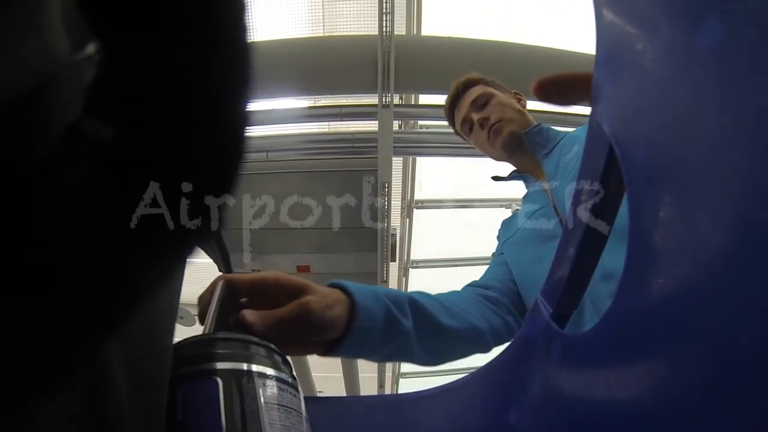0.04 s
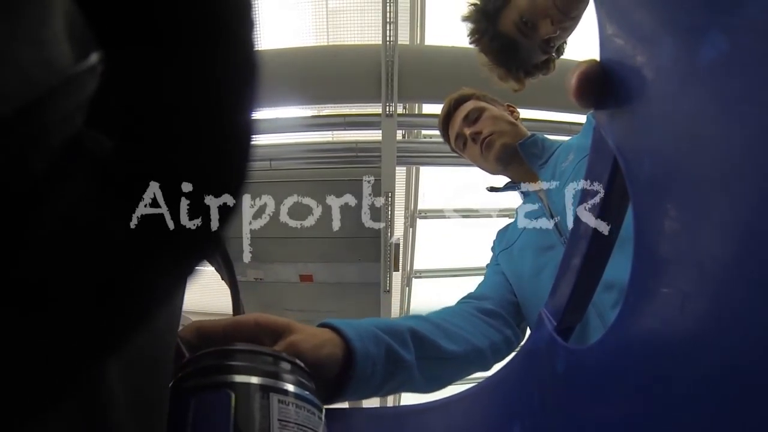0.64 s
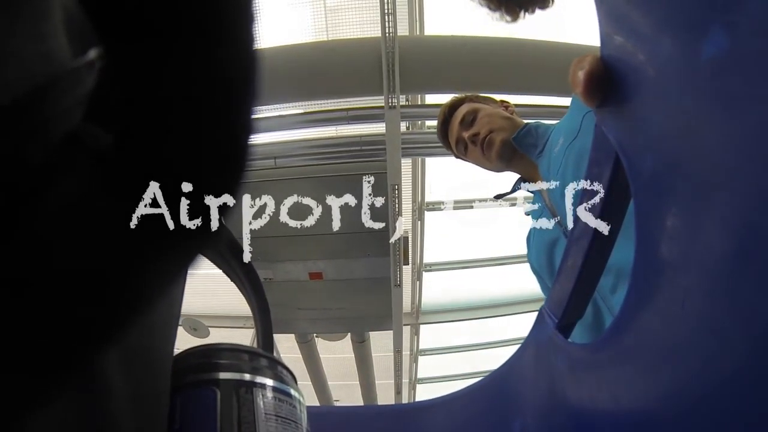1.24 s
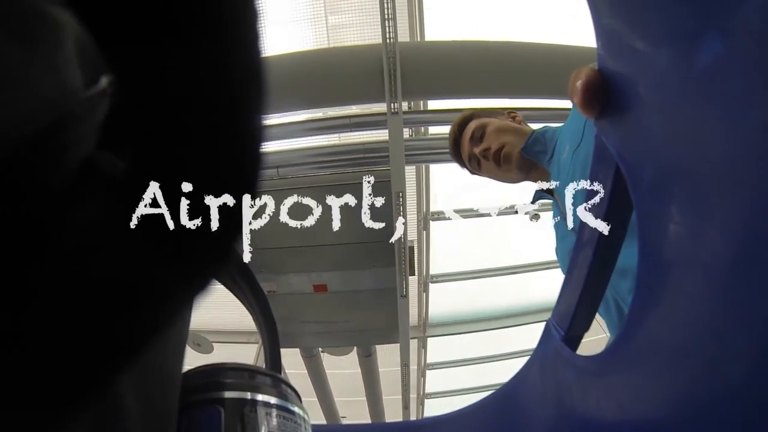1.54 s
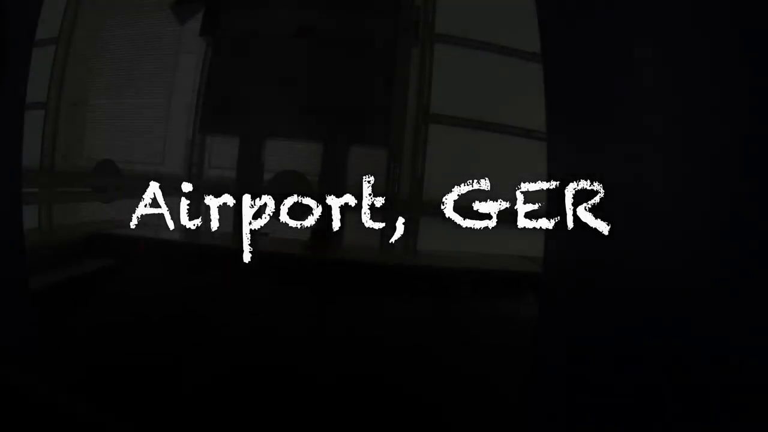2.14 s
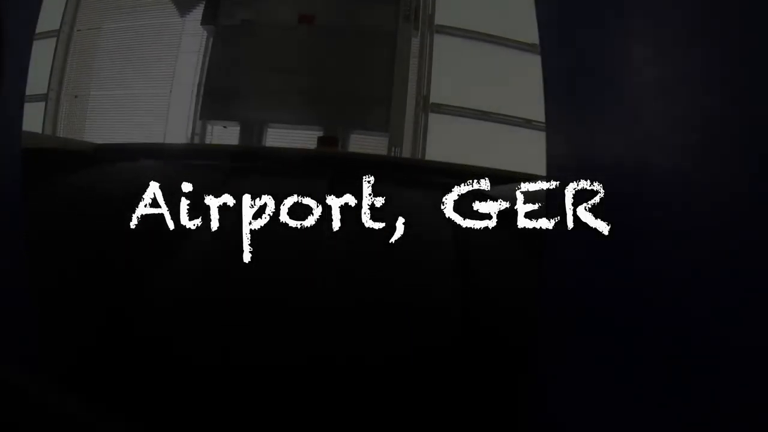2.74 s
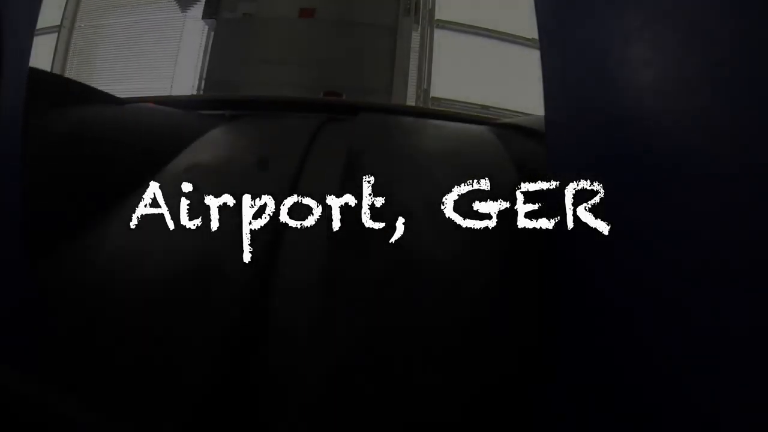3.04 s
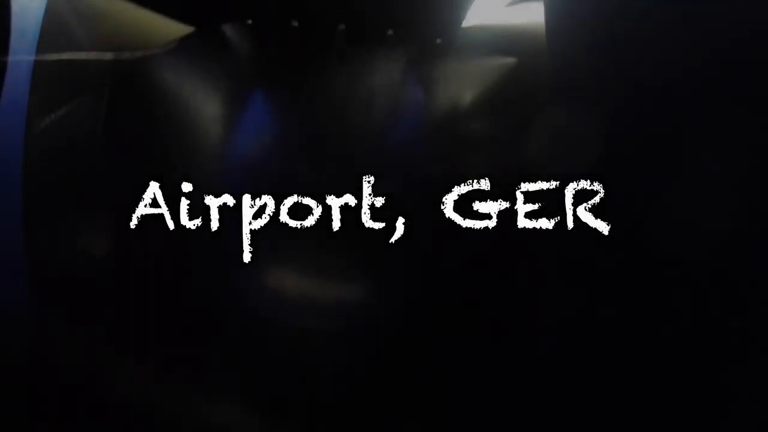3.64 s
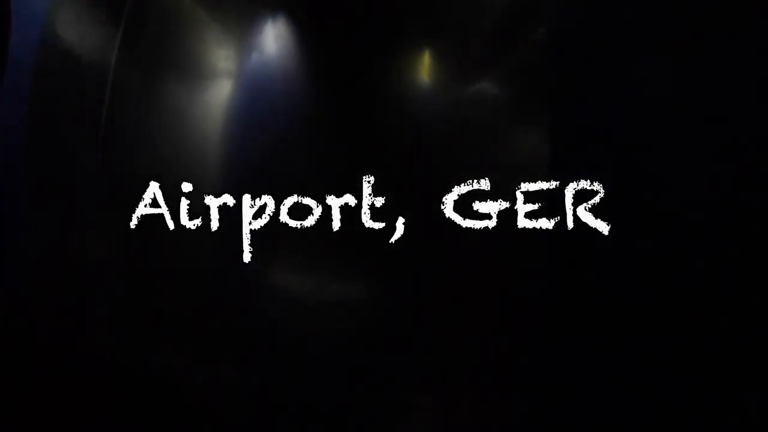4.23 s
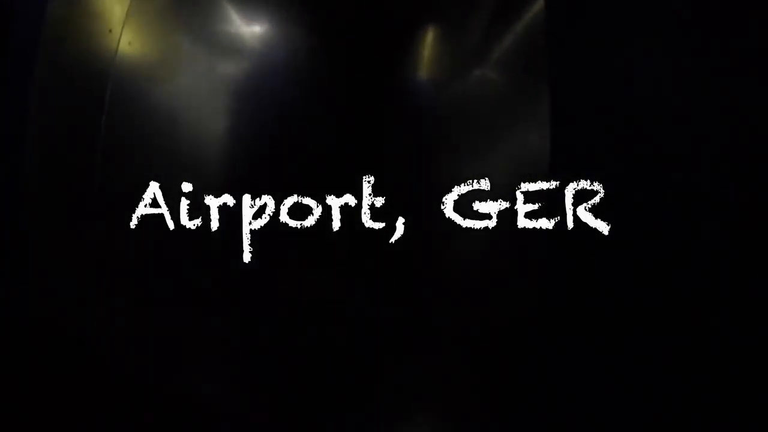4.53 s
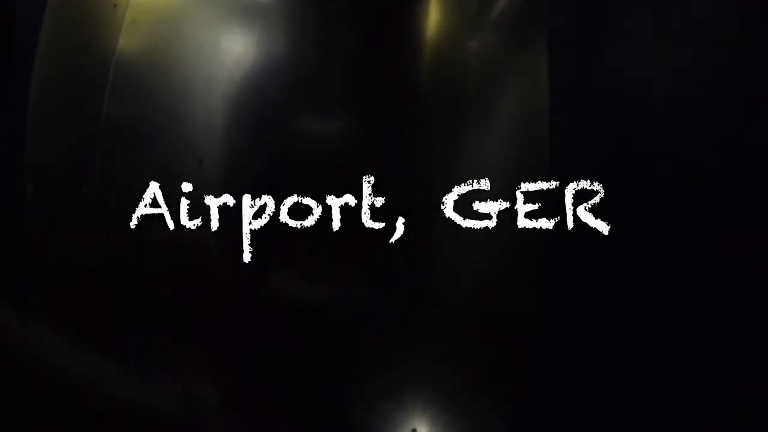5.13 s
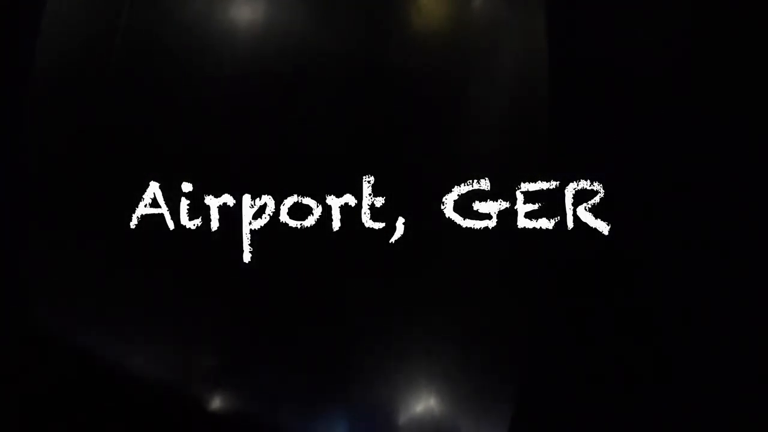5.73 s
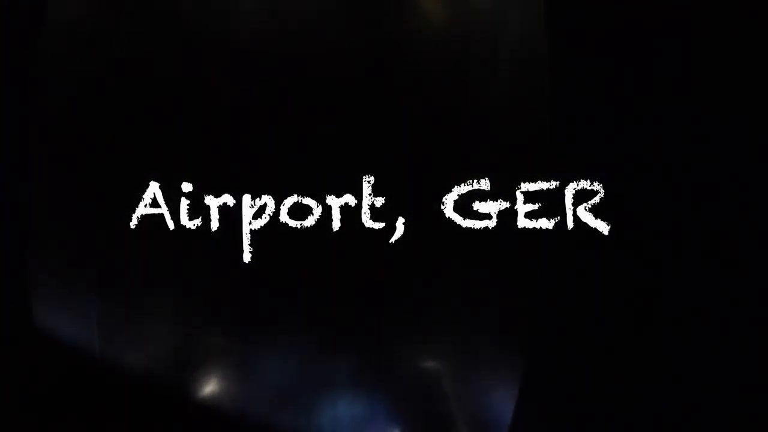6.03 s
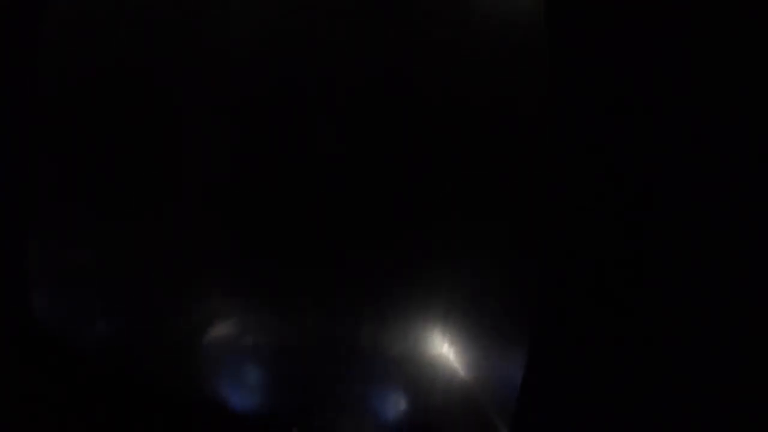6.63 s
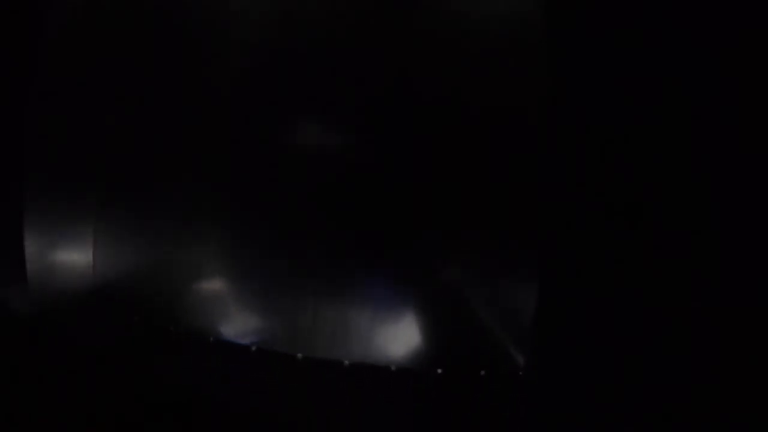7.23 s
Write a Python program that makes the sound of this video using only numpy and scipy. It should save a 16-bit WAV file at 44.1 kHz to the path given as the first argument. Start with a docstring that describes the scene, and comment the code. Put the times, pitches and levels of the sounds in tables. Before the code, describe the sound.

The microphone lies in a plastic tray entering an airport baggage scanner, so everything sounds close. Light hollow knocks fill the first second over faint hall air. At 1.2 seconds a loud double clack starts a shove over chattering rollers, with more knocks, rubbery slaps and a short scrape at 1.7. From about 2 seconds a conveyor carries the tray with a soft rasp, hiss and low rumble that swells at each roller, while the hall noise drops slightly. A deep thump at 3.1 leads into a loud burst of plastic clatter, ending in a hard slap at 3.4. Rubber curtain flaps then slap the tray more softly and irregularly until about 6 seconds. A rough dragging drone enters around 4.3, and the tray jolts and shudders just after 5. A low electric hum with faint whine and gear noise grows, strongest from 6 seconds until the end at about 7.5.

```python
"""A plastic tray, with the microphone in it, is loaded and shoved over rollers into a baggage scanner.
Impacts excite the damped modes of its shell, and rubber curtain flaps brush and slap its wall.
Friction with the belt makes a rasp that rings in the shell, over a rumble that swells at each roller.
The drive's whine, its gears and a mains hum arrive as structure-borne sound through the tray's floor.
The hall's airborne noise drops as the curtain closes behind the tray."""
import sys
import numpy as np
from scipy import signal
from scipy.fft import rfft, irfft, next_fast_len
from scipy.io import wavfile
from scipy.ndimage import uniform_filter1d, map_coordinates

SR = 44100
rng = np.random.default_rng(int(sys.argv[2]) if len(sys.argv) > 2 else 0)


def output_pcm(signal):
    """Save a mono or channel-first signal as 16-bit PCM at the path in sys.argv[1].

    Samples are clipped to [-1, 1] before scaling.
    """
    pcm = np.clip(np.atleast_2d(signal).T, -1, 1) * 32767
    wavfile.write(sys.argv[1], SR, np.round(pcm).astype(np.int16))


N = 320827
TIME_S = np.arange(N) / SR
NORMAL_RUB_DB = -33  # reference level of the belt's friction


def knocks():
    """Impact excitation: hard contacts ring the tray's shell and thump its floor."""
    # contacts: start_s, peak_db, contact_cutoff_hz, thud_re_peak_db
    hits = [(0.056, -24.5, 1700, 4), (.215, -22.5, 1900, -2), (0.251, -17, 1700, -11),
            (.276, -25, 1800, -16), (0.429, -24, 2000, -20), (0.874, -26.5, 3500, 7), (0.966, -24, 2000, 4),
            (1.199, -6, 3420, -7), (1.215, -8.5, 3040, 4), (1.233, -18.5, 1800, 8.5),
            (1.486, -17, 3000, -0.5), (1.693, -15, 5000, 4), (1.795, -11, 2800, -5.5),
            (3.182, -5.5, 4500, -10), (3.19, -9, 3980, 4.5), (3.195, -6, 2000, -2.5),
            (3.213, -6, 3500, -15), (3.22, -6, 5000, -3), (3.232, -16, 7000, -8), (3.267, -28, 9000, 4),
            (3.287, -7, 5570, -30), (3.294, -18.5, 4900, -6.5), (3.299, -12.5, 6960, 0),
            (3.34, -19.5, 3500, 0)]
    # modes of the shell: pitch_hz, level_db, t60_s
    shell_modes = [(390, -30, .03), (838, -23.5, 0.094), (1298, -14, 0.046), (1398, 4, 0.017),
                   (1619, 2, 0.013), (2500, -47.5, 0.031), (2560, -13, 0.015), (4270, -24, 0.0087),
                   (5330, -18, .008)]
    out, t = np.zeros(N), np.arange(SR // 8) / SR
    thud = np.sin(2 * np.pi * 230 * t) * amp(-60 * t / 0.025)
    for start_s, peak_db, contact_hz, thud_db in hits:
        ring = strike(shell_modes, contact_hz, crack_db=-13, tick_db=-34.5)
        add(out, start_s, amp(peak_db) * (ring + amp(thud_db) * thud))
    return out


def slaps():
    """Contact damping: the rubber of belt and flaps excites the tray's wall and deadens it at once."""
    # slaps: start_s, peak_db, contact_cutoff_hz
    hits = [(.166, -29.5, 800), (1.376, -15, 2800), (1.409, -18.5, 2500), (1.592, -12, 3620),
            (1.78, -19, 900), (1.894, -15.5, 1410), (1.971, -23, 2000), (3.427, -5, 4715),
            (3.528, -22, 2560), (3.687, -16.5, 2200), (3.745, -19.5, 1900), (4.251, -14.5, 1900),
            (4.943, -22, 1500), (5.363, -20, 1170), (5.405, -19, 1500), (5.595, -25, 1500),
            (5.667, -20, 1400), (6.087, -18.5, 1820)]
    # modes of the damped wall: pitch_hz, level_db, t60_s
    wall_modes = [(178, -4, 0.04), (400, 0, 0.022), (772, -9.5, 0.046), (1130, -12.5, 0.011),
                  (1314, 1.5, 0.023), (1800, 7.5, .01), (2310, -3.5, 0.013), (2820, 4, 0.0051),
                  (4540, -10.5, 0.0099)]
    out = np.zeros(N)
    for start_s, peak_db, contact_hz in hits:
        add(out, start_s, amp(peak_db) * strike(wall_modes, contact_hz, crack_db=-6, tick_db=-31))
    return out


def strike(modes, contact_hz, crack_db, tick_db):
    """Modal superposition: decaying sines plus a crack, at peak 1; a softer contact loses treble."""
    # spectrum of the crack: frequency_hz, density_db
    crack_spectrum = [(200, -8), (900, 10.5), (1500, 2), (3000, 0), (4000, -11.5), (5800, -12.5),
                      (7500, -23), (11000, -58), (16000, -42.5)]
    t = np.arange(SR // 8) / SR
    hz, db, t60 = np.transpose(modes)[:, :, None]
    scatter_db = rng.normal(0, 1.5, hz.shape)
    detune = rng.normal(1, .012, hz.shape)
    phase = rng.uniform(0, 2 * np.pi, hz.shape)
    decay = amp(db + scatter_db - 60 * t / t60)
    ring = np.sum(decay * np.sin(2 * np.pi * hz * detune * t + phase), axis=0) / np.linalg.norm(amp(db))
    crack = coloured(rng.standard_normal(len(t)), crack_spectrum) * amp(crack_db - 60 * t / .013)
    tick = rng.standard_normal(len(t)) * amp(tick_db - 60 * t / 0.0019)  # the surfaces' first touch
    attack = 1 - np.exp(-t / 0.0018)
    lowpass = signal.butter(2, min(contact_hz, SR / 3), fs=SR)
    blow = signal.lfilter(*lowpass, (ring + crack) * attack + tick)
    return blow / np.abs(blow).max()


def jolts():
    """Rigid-body motion: the whole tray dips and springs back in a low Gaussian tone burst."""
    # heavy jolts: centre_s, envelope_peak_db, pitch_hz, half_width_s
    bursts = [(0.976, -10, 88.5, 0.0044), (1.222, -9.5, 128, 0.0096), (1.72, -17, 153, 0.027),
              (3.12, -0.5, 47.7, 0.0088), (5.126, -13, 120, 0.0091), (6.29, -20, 149, 0.02)]
    out = np.zeros(N)
    for centre_s, db, hz, half_width_s in bursts:
        t = TIME_S - centre_s
        out += amp(db) * np.sin(2 * np.pi * hz * t) * np.exp(-(t / half_width_s) ** 2)
    return out


def rollers():
    """Forced vibration: each push by hand rocks the tray, and its ribs chatter over the rollers."""
    # pushes: start_s, length_s, level_db
    pushes = [(0.02, 0.072, -29.5), (.23, .16, -25.5), (.5, 0.32, -34), (.96, 0.044, -30),
              (1.22, 0.28, -20.5), (1.5, 0.24, -17.5)]
    # spectrum of the rocking: frequency_hz, density_db
    sway_spectrum = [(30, -17), (70, -3), (105, 1.5), (135, -1.5), (200, -59), (500, -82.5)]
    # spectrum of the ribs on the rollers: frequency_hz, density_db
    chatter_spectrum = [(150, 6), (330, 10), (520, -2.5), (700, -1.5), (880, 8), (1060, -34), (1330, 17.5),
                        (1900, -65), (5000, -36)]
    chatter = amp(-15.5) * coloured(friction(slips_per_s=200, smooth=.4), chatter_spectrum)
    return held(pushes, rise_s=0.21, fall_s=0.16) * (noise(sway_spectrum) + chatter)


def brushes():
    """Sliding friction: things brush the microphone's case in short strokes that add in power."""
    # strokes: start_s, length_s, level_db
    strokes = [(0.235, 0.037, -37), (0.379, 0.026, -29), (.537, 0.0026, -31.5), (1.25, 0.038, -37.5),
               (1.38, 0.027, -32), (1.484, 0.0028, -25), (1.49, 0.038, -34), (1.598, 0.038, -36),
               (1.686, 0.061, -25), (1.733, 0.015, -17.5), (3.108, 0.0098, -24.5), (3.121, 0.027, -29.5),
               (5.461, 0.062, -35)]
    # spectrum of the brushing: frequency_hz, density_db
    spectrum = [(150, 3.5), (600, -2), (1000, -0.5), (1450, 13), (2100, 0), (3300, -3), (4500, -9.5),
                (6000, -16.5), (7500, -21.5), (13000, -31.5), (16000, -40)]
    power = sum(swell(start_s, db, rise_s=0.44 * length_s, fall_s=0.46 * length_s, hold_s=length_s) ** 2
                for start_s, length_s, db in strokes)
    flicker = amp(2.5 * wobble(260))
    grit = coloured(friction(slips_per_s=5000, smooth=.7), spectrum)
    return np.sqrt(power) * unit(flicker * grit)


def scrapes():
    """Resonant filtering: a hard edge scrapes the case, and the rubbing noise rings in its modes."""
    # scrapes: start_s, level_db, lowest_mode_hz
    strokes = [(1.481, -41, 5420), (1.735, -18, 2360), (3.107, -25, 3420)]
    # modes of an edge: frequency_ratio, level_db
    edge_modes = [(1, 2.5), (1.5, -13.5), (2.35, -14.5)]
    out = np.zeros(N)
    for start_s, db, lowest_hz in strokes:
        edge = lambda hz: sum(amp(mode_db) / (1 + ((hz / (ratio * lowest_hz) - 1) / .12) ** 2)
                              for ratio, mode_db in edge_modes)
        envelope = swell(start_s, db, rise_s=0.0066, fall_s=0.0065, hold_s=0.0077)
        out += envelope * unit(filtered(rng.standard_normal(N), edge))
    return out


def judder():
    """Stick-slip motion: the tray's foot catches and slips on the belt for a moment."""
    # spectrum of the shudder: frequency_hz, density_db
    spectrum = [(70, -21), (130, -17), (170, 2), (230, 1), (300, -28.5), (440, -21), (600, -28),
                (820, -19.5), (1050, -31), (1400, -15), (2200, -36), (6000, -78.5)]
    envelope = swell(peak_s=5.32, db=-15.5, rise_s=0.097, fall_s=0.082, hold_s=0.055)
    return envelope * coloured(friction(slips_per_s=160, smooth=0.93), spectrum)


def belt():
    """Friction noise: the belt's rasp rings in the shell; belt and sliding flaps hiss above it."""
    # spectrum of the rasp: frequency_hz, density_db
    rasp_spectrum = [(250, -3.5), (420, -18.5), (580, -21.5), (760, -13.5), (930, -13), (1200, -7.5),
                     (1470, 2.5), (1750, -7), (2050, -17), (4000, -42.5), (8000, -82)]
    # spectrum of the hiss: frequency_hz, density_db
    hiss_spectrum = [(1000, -13), (2000, -1.5), (3000, -2.5), (4000, -9), (4700, -13.5), (6000, -16),
                     (7800, -29), (10700, -37), (15500, -61)]
    # curtain flaps sliding over the tray: start_s, length_s, level_db
    slides = [(1.4, 1.72, -49), (4.24, .25, -48), (4.7, 0.69, -56), (6.27, 1.0, -52)]
    rub_db = rubbing_db()
    grip = amp(.6 * wobble(25))
    rasp = coloured(friction(slips_per_s=1400, smooth=1.58), rasp_spectrum)
    hiss = patchy(coloured(friction(slips_per_s=3000, smooth=1.9), hiss_spectrum), depth_db=1.5)
    rasp_gain = amp(NORMAL_RUB_DB + rub_db + 0.5)
    hiss_gain = np.hypot(amp(-49 + 0.68 * rub_db), held(slides, rise_s=0.49, fall_s=.06))
    return grip * (rasp_gain * rasp + hiss_gain * hiss)


def rubbing_db():
    """Relative friction level: how much harder than normal the belt rubs over its bed."""
    # the belt's rubbing: time_s, level_db
    rubbing = [(0.0, -35.5), (.1, -48), (.4, -41), (0.6, -53.5), (1.13, -41), (1.24, -36), (1.9, -32.5),
               (3.12, -29.5), (3.17, -40.5), (3.95, -36), (4.35, -32), (5.37, -31), (5.7, -34),
               (7.27, -30.5)]
    return np.interp(TIME_S, *np.transpose(rubbing)) - NORMAL_RUB_DB


def rumble():
    """Broadband forcing: rubbing shakes the frame and the tray's floor; both swell over each roller."""
    # rides over a roller: peak_s, frame_db, floor_db
    heaves = [(1.45, -18, -34), (2.7, -23.5, -30), (3.05, -26.5, -25.5), (4.25, -23.5, -29.5),
              (4.55, -27, -32), (5.17, -23, -25.5), (5.8, -51, -26), (6.3, -28.5, -31), (7.15, -31, -29)]
    # spectrum of the frame's rumble: frequency_hz, density_db
    frame_spectrum = [(10, -3.5), (25, 9.5), (45, 3), (70, 3.5), (110, -5.5), (200, -36), (500, -84)]
    # spectrum of the floor's drumming: frequency_hz, density_db
    floor_spectrum = [(60, -52), (110, 1.5), (150, 6.5), (230, -4.5), (320, -17.5), (500, -19),
                      (1000, -71.5)]
    rub_db = rubbing_db()
    frame_gain, floor_gain = amp(-31 + 0.45 * rub_db), amp(-38 + 0.13 * rub_db)
    for peak_s, frame_db, floor_db in heaves:
        heave = swell(peak_s, db=0, rise_s=0.42, fall_s=0.65)
        frame_gain = np.hypot(frame_gain, amp(frame_db) * heave)
        floor_gain = np.hypot(floor_gain, amp(floor_db) * heave)
    return frame_gain * noise(frame_spectrum) + floor_gain * noise(floor_spectrum)


def machine():
    """Structure-borne sound: mains hum, whine and gears come through when the tray sits firmly."""
    # spells of firm contact: start_s, length_s, hum_db
    seatings = [(1.85, 0.48, -29), (2.45, 0.87, -31), (3.92, 0.25, -27.5), (4.35, 0.44, -24),
                (5.12, 0.44, -24.5), (5.77, 0.54, -17), (6.22, 1.5, -15.5)]
    # tones of the drive: pitch_hz, relative_db
    tones = [(131, 13), (200, -3), (263, -2), (365, 2.5), (734, -7), (1480, 1.5)]
    # spectrum of the churning gears: frequency_hz, density_db
    gear_spectrum = [(200, -44.5), (520, 4.5), (800, 6), (1050, 9), (1400, -18.5), (3000, -79.5)]
    hum_hz, normal_hum_db, drive_db = 100.1, -21.5, -47
    seated = held(seatings, rise_s=0.23, fall_s=.2)
    hum = seated * amp(0.66 * wobble(15)) * np.sin(2 * np.pi * hum_hz * TIME_S)
    whine = sum(amp(db + 1.1 * wobble(9.1)) * np.sin(2 * np.pi * hz * TIME_S + 0.62 * wobble(10))
                for hz, db in tones)
    gears = amp(-1) * noise(gear_spectrum)
    drive_gain = amp(drive_db) * (seated / amp(normal_hum_db)) ** 0.57  # 0.57 dB per dB of hum
    return np.sqrt(2) * (hum + drive_gain * whine) + drive_gain * gears


def drag():
    """Narrow-band friction noise: the tray drags along with a rough drone."""
    # spells of dragging: start_s, length_s, level_db
    drags = [(2.27, 0.045, -41), (4.32, 0.41, -37.5), (5.1, 0.64, -43.5), (6.15, 0.95, -43)]
    # spectrum of the drone: frequency_hz, density_db
    spectrum = [(220, -46.5), (330, -14), (375, 11.5), (420, -13.5), (480, -10), (700, -62)]
    return held(drags, rise_s=0.32, fall_s=0.45) * noise(spectrum)


def hall():
    """Airborne noise: the hall's air, and a thin narrow-band whistle until the tray moves off."""
    # spectrum of the hall: frequency_hz, density_db
    air_spectrum = [(150, 16), (300, 5.5), (500, -9.5), (1000, -24.5), (1330, -10.5), (1650, -5),
                    (2050, -26.5), (3000, -33.5), (5000, -21.5), (8000, -29), (11000, -35.5),
                    (15500, -43.5)]
    whistle = noise([(3000, -59), (3680, -6), (3820, 20), (3950, 5), (4080, -9), (5000, -64)])
    fade_out = np.clip((.85 - TIME_S) / 0.054, 0, 1)
    return amp(-42.5) * noise(air_spectrum) + amp(-65.5) * fade_out * whistle


def curtain():
    """Insertion loss: the gain on the hall's noise falls as the curtain closes behind the tray."""
    start_s, closing_s, loss_db = 2.2, .1, 4
    return amp(-loss_db * np.clip((TIME_S - start_s) / closing_s, 0, 1))


def friction(slips_per_s, smooth):
    """Shot noise: tiny slips of random size over smooth rubbing."""
    slips = (rng.random(N) < slips_per_s / SR) * rng.standard_normal(N)
    return unit(slips) + smooth * rng.standard_normal(N)


def swell(peak_s, db, rise_s, fall_s, hold_s=0):
    """Exponential envelope: peaks, holds, and is 20 dB down rise_s before and fall_s after."""
    distance = np.maximum((peak_s - TIME_S) / rise_s, (TIME_S - peak_s - hold_s) / fall_s)
    return amp(db - np.clip(20 * distance, 0, 200))


def held(rows, rise_s, fall_s):
    """Upper envelope of held swells that share one rise and fall."""
    return np.max([swell(start_s, db, rise_s, fall_s, hold_s) for start_s, hold_s, db in rows], axis=0)


def wobble(knots_per_s):
    """Random modulation: a smooth curve through Gaussian knots."""
    coarse_s = TIME_S[::64]
    curve = map_coordinates(rng.standard_normal(1024), [coarse_s * knots_per_s], mode="wrap")
    return np.interp(TIME_S, coarse_s, curve)


def patchy(x, depth_db):
    """Spectral modulation: random patches of gain drift over frequency and time."""
    spectrogram = signal.stft(x, nperseg=512)[2]
    field = uniform_filter1d(rng.standard_normal(spectrogram.shape), size=4, axis=0)
    field = unit(uniform_filter1d(field, size=50, axis=1))
    return unit(signal.istft(spectrogram * amp(depth_db * field), nperseg=512)[1][:N])


def noise(spectrum):
    """Coloured Gaussian noise of rms 1."""
    return coloured(rng.standard_normal(N), spectrum)


def coloured(x, spectrum):
    """Spectral shaping by (frequency_hz, gain_db) points, at rms 1."""
    points_hz, db = np.transpose(spectrum)
    return unit(filtered(x, lambda hz: amp(np.interp(np.log(hz + 1), np.log(points_hz), db))))


def filtered(x, response):
    """Linear filtering: the spectrum of x times a frequency response."""
    size = next_fast_len(len(x) + SR // 4)
    return irfft(rfft(x, size) * response(np.fft.rfftfreq(size, 1 / SR)), size)[:len(x)]


def add(track, start_s, sound):
    """Superpose a sound on the track from start_s."""
    start = max(round(start_s * SR), 0)
    track[start:start + len(sound)] += sound[:N - start]


def amp(db):
    """Decibels to gain."""
    return 10 ** (np.asarray(db) / 20)


def unit(x):
    """Scale to rms 1."""
    return x / np.sqrt(np.mean(x ** 2) + 1e-20)


def scene():
    """Superposition: all sources sum at the microphone in the tray."""
    contacts = knocks() + slaps() + brushes() + scrapes() + jolts()
    conveyor = rollers() + belt() + rumble() + judder() + machine() + drag()
    return (contacts + conveyor + curtain() * hall())[None]


def record(dry):
    """Resonance of the microphone's case colours the sound, which is then clipped and band-limited."""
    # resonances of the case: centre_hz, width_hz, level_re_direct_db
    case_modes = [(2345, 15, -1.5), (2825, 24, -12), (3130, 44, -5), (3470, 72, -5), (4060, 35, -5.5),
                  (5030, 22, -19.5), (5800, 70, -17.5), (7850, 390, -15), (10760, 310, 1)]
    case = lambda hz: 1 + sum(amp(db) * 1j * hz * width / (centre ** 2 - hz ** 2 + 1j * hz * width)
                              for centre, width, db in case_modes)
    end_fades = signal.windows.tukey(N, .002)
    clipped = np.clip(filtered(dry[0] * end_fades, case), -1, 1)
    return filtered(clipped, lambda hz: hz < 15750)[None]


dry = scene()
out = record(dry)
output_pcm(out)
```